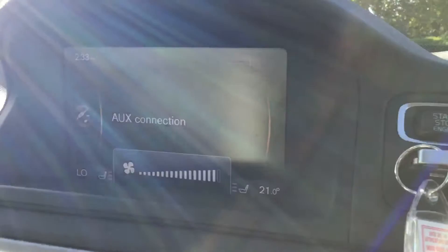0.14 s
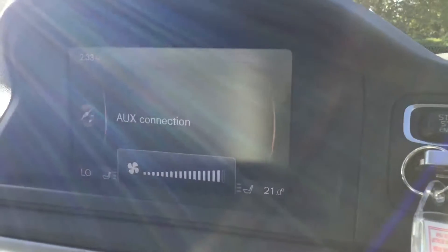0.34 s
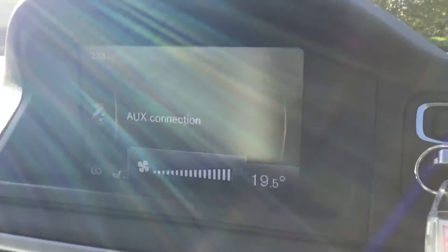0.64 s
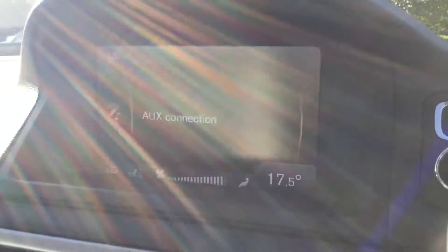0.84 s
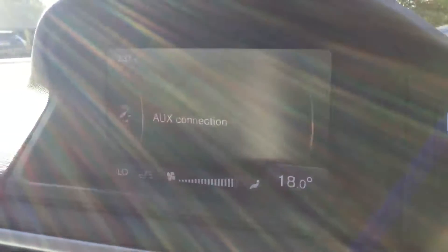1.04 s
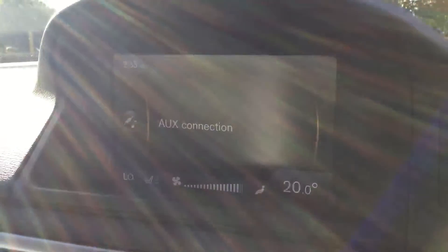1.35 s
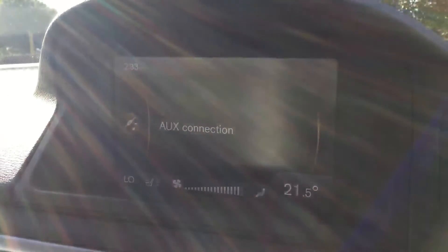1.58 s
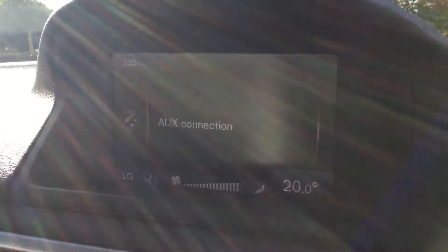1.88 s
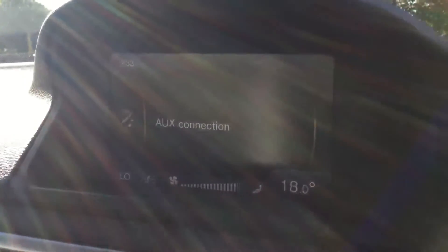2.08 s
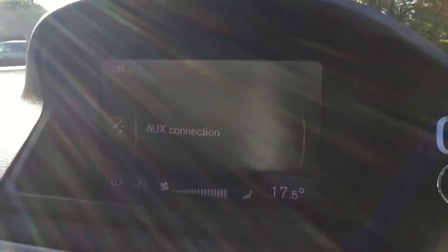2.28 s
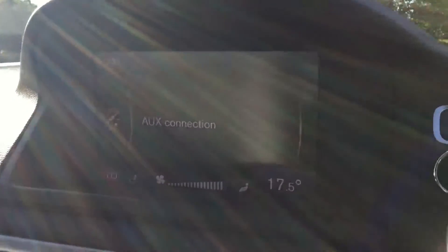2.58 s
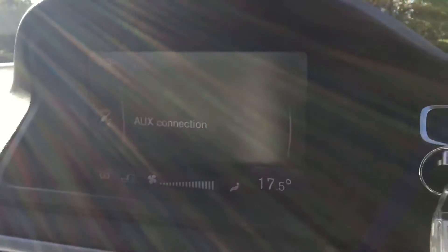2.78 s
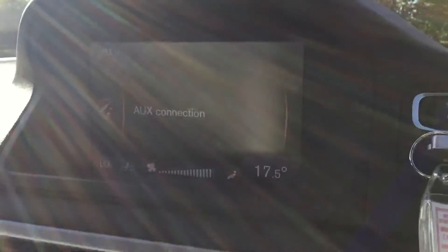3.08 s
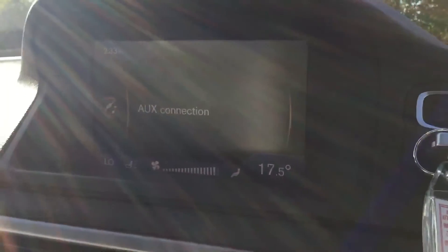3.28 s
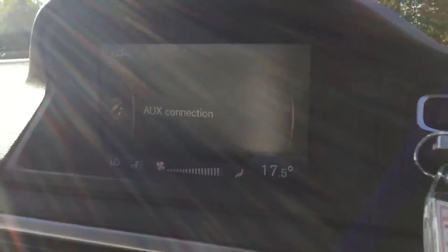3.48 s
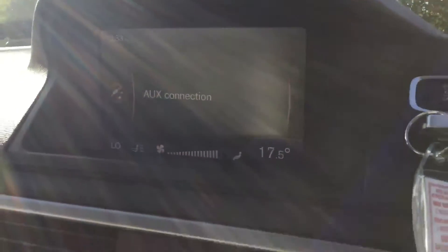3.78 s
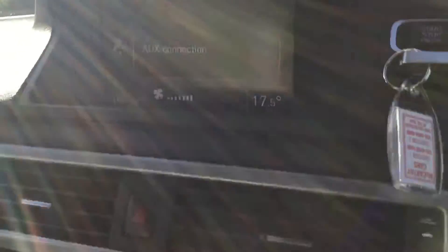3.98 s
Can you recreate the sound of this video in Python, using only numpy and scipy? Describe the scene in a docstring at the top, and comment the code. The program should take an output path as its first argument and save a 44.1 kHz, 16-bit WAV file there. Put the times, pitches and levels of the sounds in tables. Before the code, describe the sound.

Inside a car, a hard-running blower blasts straight across a hand-held microphone. Loud, irregular low thumps, fluttering rumble and dull snaps dominate throughout, broken by tiny lulls. Far quieter behind them is a smooth, even rush of vent air. Small plastic knob detents click during the first two seconds, then stop; a brief bright rustle follows, and faint ticks return near the end. Close, dry, overloaded sound.

```python
"""In a car cabin a blower runs hard, and its jet blows across a hand-held microphone.
Turbulence, shaped noise with gusts, rumbles at the port; wave packets make eddies thump and snap on it,
and deep packets make the low thuds of the recorder's limiter.
Coloured noise gives the smooth rush of the vents and one brief bright rustle;
noise bursts through resonators give knob detents and ticks, dying sines a few tiny high ticks."""
import sys
import numpy as np
from scipy import signal
from scipy.fft import rfft, irfft
from scipy.io import wavfile
from scipy.ndimage import uniform_filter1d, minimum_filter1d

SR = 44100
rng = np.random.default_rng(int(sys.argv[2]) if len(sys.argv) > 2 else 0)


def unload_audio(sound):
    """Save the sound as a 16-bit wav file, at the path given as the first command line argument."""
    columns = np.transpose(np.atleast_2d(sound))
    # keep every value between -1 and 1, then stretch to whole-number steps
    steps = np.round(np.clip(columns, -1, 1) * 32767)
    wavfile.write(sys.argv[1], SR, steps.astype(np.int16))


def volts_from_db(level):
    """Convert decibel levels to linear amplitude ratios."""
    exponent = np.asarray(level, float) / 20
    return 10 ** exponent


N = 182221   # length in samples


def rms_one(x):
    """Normalisation: a signal divided by its root mean square has unit power."""
    return x / np.sqrt(np.mean(x ** 2) + 1e-20)


def at_hz(points, hz):
    """Logarithmic pitch axis: a curve is read in equal steps per octave."""
    points_hz, values = np.transpose(points)
    return np.interp(np.log(hz), np.log(points_hz), values)


def drift(rate_hz):
    """Low-pass filtering: two equal poles turn white noise into a slow random drift of unit spread."""
    settle = SR // 2
    r = np.exp(-2 * np.pi * rate_hz / SR)
    slow = signal.lfilter([1], [1, -2 * r, r * r], rng.standard_normal(N + settle))
    return rms_one(slow[settle:])


def coloured(colour):
    """Spectral shaping: a weighted noise spectrum yields stationary noise, here of rms 1."""
    hz = np.maximum(np.arange(N // 2 + 1) * SR / N, 1)
    spectrum = rfft(rng.standard_normal(N)) * volts_from_db(at_hz(colour, hz))
    return hz, spectrum / np.sqrt(np.mean(irfft(spectrum, N) ** 2))


# course of the jet's buffeting on the port: time_s, level_db
JET_COURSE = [(0, -17.5), (.7, -21), (1.08, -16), (1.45, -21.5), (1.61, -21), (1.76, -20), (2.0, -19),
              (2.2, -16.5), (2.5, -19.5), (3.0, -18), (3.68, -18.5), (4.13, -20)]
# moments when the jet slips off the port: centre_s, depth_db (negative lifts), half_length_s
JET_LULLS = [(0.22, 12.5, 0.026), (0.372, 5, 0.017), (0.437, 6, 0.0098), (0.881, 18.5, 0.0073),
             (1.094, 9.5, 0.024), (1.325, 2, 0.045), (1.626, 4.5, 0.021), (1.75, 2.5, 0.033),
             (1.984, 7.5, 0.019), (2.16, 11, 0.0069), (2.251, 4, 0.031), (2.696, 3.5, 0.013),
             (2.838, 7.5, 0.019), (3.103, 10, 0.011), (3.285, 28, 0.0021), (3.409, 10.5, 0.0073),
             (3.596, 4, 0.01), (3.76, -0.5, 0.018), (4.025, 19, 0.0087)]


def jet_db(s):
    """Intermittency: the flow's level at the given times is a slow course less bell-shaped lulls."""
    dips = sum(depth_db * np.exp(-((s - at) / half) ** 2) for at, depth_db, half in JET_LULLS)
    return np.interp(s, *np.transpose(JET_COURSE)) - dips


# colour of the turbulence, before its gusts: pitch_hz, relative density_db per Hz
BUFFET_COLOUR = [(15, -33), (25, -27), (40, -18), (60, -15), (124, 5), (198, 7.5), (356, 0), (462, -9),
                 (769, -19), (926, -36), (1300, -45.5), (2200, -120)]
# how strongly each pitch follows a gust: pitch_hz, lift_db per unit of gust
GUST_RESPONSE = [(40, 1.0), (120, 0.31), (300, 4.38), (700, 7.9)]


def buffeting(level_db, large):
    """Modulated turbulence: gusts, partly the wake of the large eddies, lift the upper bands most."""
    gust_hz, swirl_hz = 49.7, 71.5       # corners of the shared gusts and of each band's own swirl
    gust_cap = 1.34                      # chance gusts saturate at this many spreads
    gust_lag_cycles = 0.92               # a gust reaches each band after this many swings: highs first
    stirred, wake_s = 0.26, 0.015        # weight of the wake, and its averaging time
    hz, spectrum = coloured(BUFFET_COLOUR)
    wake = np.log(uniform_filter1d(large ** 2, size=int(wake_s * SR)) + 0.00036)
    chance_gust = gust_cap * np.tanh(0.88 * drift(gust_hz) / gust_cap)
    gust = stirred * rms_one(wake - wake.mean()) + chance_gust
    n, out = np.arange(N), 0
    for step in range(14):
        centre_hz = 20 * 2 ** (step / 2)   # half-octave bands that overlap
        share = np.cos(np.clip(np.log2(hz / centre_hz), -.5, .5) * np.pi) ** 2
        band = irfft(spectrum * share, N)
        late_gust = np.interp(n - gust_lag_cycles * SR / centre_hz, n, gust)
        lift_db = at_hz(GUST_RESPONSE, centre_hz) * (late_gust + .5 * drift(swirl_hz))
        out = out + band * volts_from_db(lift_db)
    return volts_from_db(level_db) * rms_one(out)


# colour of the vent rush, before the duct resonances: pitch_hz, relative density_db per Hz
RUSH_COLOUR = [(530, -6.5), (900, -3.5), (1060, -2), (1240, -3), (1690, -1), (2040, -7.5), (2390, -7.5),
               (3010, -8.5), (3260, -13), (3990, -12.5), (4330, -16), (6010, -16), (7500, -24.5),
               (9750, -52), (16500, -120)]
# colour of the top hiss: pitch_hz, relative density_db per Hz
HISS_COLOUR = [(4240, -6.5), (7200, -19), (7860, 3.5), (8790, 4), (10200, -1), (13700, 0), (15600, -6.5)]
# duct resonances in the rush: pitch_hz, width_hz, lift_db
DUCT_RESONANCES = [(1730, 130, 0), (2360, 130, 4.5), (3060, 51, 5), (3395, 84, 5.5), (3970, 340, 0.5),
                   (6320, 870, 2.5)]
# rush of the air flow, before the duct resonances: time_s, level_db
AIR_FLOW = [(0, -43), (.7, -42.5), (1.0, -41.5), (2.1, -41), (3.95, -41), (4.13, -43)]


def vents():
    """Broadband flow noise: air rushes evenly from the louvres, with mild duct resonances and a top hiss."""
    mean_hiss_db, hiss_follows = -60, 1.8   # hiss at mean flow; its change in dB per dB of rush
    rush_db = np.interp(np.arange(N) / SR, *np.transpose(AIR_FLOW))
    hiss_db = mean_hiss_db + hiss_follows * (rush_db - rush_db.mean())
    hz, rush = coloured(RUSH_COLOUR)
    for centre_hz, width_hz, lift_db in DUCT_RESONANCES:
        rush = rush * volts_from_db(lift_db / (1 + (2 * (hz - centre_hz) / width_hz) ** 2))
    hiss = irfft(coloured(HISS_COLOUR)[1], N)
    return volts_from_db(rush_db) * irfft(rush, N) + volts_from_db(hiss_db) * hiss


def packets(rows):
    """Wave packets: smooth swings sink in pitch; their spectrum dies away exponentially upward."""
    sag = 0.317   # starts higher, ends lower by about this share of the pitch
    half = 4000
    out, t = np.zeros(N + 2 * half), np.arange(-half, half) / SR
    phases = rng.uniform(0, 2 * np.pi, len(rows))
    for (peak_s, level_db, hz, length_s), phase in zip(rows, phases):
        power = max((2.67 * hz * length_s) ** 2, 3.0)   # more cycles, higher power
        packet = (1 - 2j * np.pi * hz * t / power) ** -power
        bend = phase - sag * 2 * np.pi * hz * np.hypot(t, length_s)
        at = round(peak_s * SR)
        out[at:at + 2 * half] += volts_from_db(level_db) * np.real(packet * np.exp(1j * bend))
    return out[half:N + half]


# strongest large eddies on the port: peak_s, level_db of the envelope peak, nominal length_s, pitch_hz
LARGE_EDDIES = [(0.0098, -9.5, 0.012, 248), (0.0475, -8.5, 0.0068, 203), (0.125, -4.5, 0.0037, 249),
                (0.238, -5.5, 0.0036, 284), (0.3925, -9.5, 0.01, 211), (0.4053, -6.6, 0.0052, 236),
                (0.5, -3.5, 0.0065, 261), (0.5413, -7.5, 0.0059, 255), (0.5903, -5, 0.0039, 220),
                (0.629, -14.5, 0.012, 246), (0.684, -10, 0.01, 222), (0.759, -6, 0.0065, 196),
                (0.7765, -5, 0.0033, 276), (0.8395, -7, 0.0034, 239), (0.8558, -11.5, 0.0095, 243),
                (0.908, -10.5, 0.005, 275), (0.932, -12, 0.0074, 301), (0.985, -15, 0.0056, 261),
                (0.9997, -13, 0.0037, 229), (1.0223, -11, 0.0072, 185), (1.1303, -7.5, 0.006, 221),
                (1.1665, -3.5, 0.0041, 272), (1.1995, -5.5, 0.0073, 186), (1.235, -10, 0.02, 221),
                (1.2963, -5.5, 0.0051, 235), (1.376, -9, 0.0055, 254), (1.3957, -5.5, 0.0034, 230),
                (1.4095, 0.5, 0.0047, 234), (1.4254, -6, 0.0092, 211), (1.447, -7.5, 0.0049, 314),
                (1.473, -11, 0.0069, 231), (1.507, -9.5, 0.0053, 206), (1.6784, -9, 0.014, 197),
                (1.697, -7.5, 0.011, 221), (1.7155, -14.5, 0.0035, 210), (1.7351, -9, 0.005, 222),
                (1.7594, -10.0, 0.0049, 227), (1.8274, -5, 0.005, 259), (1.9374, -4.5, 0.0029, 275),
                (1.9542, -7, 0.0066, 169), (1.965, -8.5, 0.0042, 266), (2.102, -14, 0.0039, 234),
                (2.1275, -15.5, 0.0072, 210), (2.1428, -13, 0.015, 194), (2.19, -3, 0.0022, 275),
                (2.286, -2, 0.0032, 229), (2.3341, -11, 0.033, 208), (2.3375, -1.5, 0.011, 211),
                (2.3611, -11.5, 0.0045, 245), (2.3743, -10.9, 0.0045, 230), (2.4196, -4.5, 0.006, 202),
                (2.4616, -4, 0.0056, 265), (2.5127, 0.5, 0.0075, 208), (2.5178, -8, 0.024, 223),
                (2.5447, -2, 0.0033, 299), (2.5635, -11, 0.0089, 208), (2.6162, -4.5, 0.0057, 181),
                (2.6219, -14.5, 0.013, 195), (2.6764, -5, 0.0053, 222), (2.746, -10, 0.012, 300),
                (2.764, -1.5, 0.0052, 328), (2.8508, -9.7, 0.0033, 290), (2.874, -5.5, 0.004, 247),
                (2.9293, -12.5, 0.0079, 277), (2.9514, 0.5, 0.0048, 211), (2.9837, -8.5, 0.0077, 266),
                (3.0445, -15, 0.0048, 208), (3.0701, -8, 0.007, 196), (3.102, -7, 0.0064, 223),
                (3.1713, -12.5, 0.0099, 219), (3.197, -13.5, 0.013, 250), (3.219, -8.5, 0.0047, 227),
                (3.2528, -15.5, 0.015, 296), (3.313, -4.5, 0.019, 196), (3.3746, -8.5, 0.0027, 247),
                (3.3834, -2, 0.0044, 297), (3.4602, -11, 0.0066, 252), (3.507, -8, 0.0042, 247),
                (3.559, -15, 0.0026, 216), (3.659, -12, 0.0132, 211), (3.701, -4.5, 0.0046, 221),
                (3.767, -10.5, 0.0035, 276), (3.87, -3, 0.0032, 233), (3.8903, -14, 0.024, 223),
                (3.9194, -8, 0.0019, 254), (3.946, -10.5, 0.0028, 293), (3.9657, 0.5, 0.0065, 303),
                (4.0415, -9.5, 0.0062, 276), (4.053, -10.5, 0.0036, 263), (4.1099, -10.5, 0.0064, 216)]
# sharpest small eddies on the port: peak_s, level_db of the envelope peak, pitch_hz
SMALL_EDDIES = [(0.126, -18.5, 690), (0.405, -18, 644), (0.419, -14.5, 760), (0.4975, -14.5, 680),
                (0.537, -18, 680), (0.59, -19, 640), (0.6324, -6.5, 680), (0.68, -15.5, 650),
                (0.817, -20, 690), (0.8392, -12.5, 720), (0.9047, -11, 706), (1.077, -23.5, 690),
                (1.203, -28, 760), (1.2428, -13.5, 870), (1.2948, -12.5, 806), (1.375, -18, 614),
                (1.385, -20.5, 900), (1.4049, -8, 810), (1.4208, -11.5, 800), (1.4257, -7, 825),
                (1.4462, -11.5, 850), (1.489, -18, 700), (1.5118, -10.5, 623), (1.547, -19, 723),
                (1.692, -19.5, 696), (1.827, -16, 710), (1.871, -18, 704), (1.923, -16, 720),
                (2.0895, -13, 770), (2.1938, -5, 1080), (2.2029, -11, 620), (2.331, -8.5, 885),
                (2.3366, -10, 940), (2.4206, -3.5, 880), (2.461, -9.5, 840), (2.5, -15, 670),
                (2.519, -12.5, 764), (2.5415, -7.5, 875), (2.5658, -12.5, 915), (2.61, -27, 780),
                (2.673, -20.5, 900), (2.73, -18, 670), (2.7542, -7.5, 860), (2.762, -7, 1150),
                (2.767, -11.5, 910), (2.8495, -15, 795), (2.8817, -13, 930), (2.887, -16, 790),
                (2.9276, -11, 660), (2.984, -16, 756), (3.066, -20.5, 696), (3.0966, -6.5, 770),
                (3.1578, -12, 793), (3.185, -18, 674), (3.203, -10, 800), (3.21, -11.5, 696),
                (3.246, -27, 720), (3.253, -11, 615), (3.298, -14, 620), (3.3052, -22, 656),
                (3.309, -23.5, 670), (3.378, -18.5, 796), (3.388, -11.5, 844), (3.4724, -16, 833),
                (3.4985, -6, 690), (3.5085, -10, 674), (3.57, -10.5, 710), (3.7631, -6.5, 860),
                (3.7665, -14.5, 805), (3.864, -12, 705), (3.889, -11, 684), (3.903, -16, 684),
                (3.9128, -10, 866), (3.944, -14, 680), (3.9611, -9, 760), (3.997, -14, 645),
                (4.061, -13, 640), (4.103, -14.5, 676)]


def thumps_and_snaps(flutter_count=110):
    """Eddy scales: large eddies thump, small ones snap; listed and chance ones join as packets."""
    front_lead_s, front_over_db = 0.0035, -5.5     # mean lead on the thump; level over the buffeting
    front_hz, front_hz_spread = 790, 0.062         # mid pitch, and its spread as a log ratio
    flutter_over_db, flutter_spread_db, flutter_hz = -7, 1.5, 614
    body_lag_s, body_db, body_pitch = 0.00208, -2.5, 0.58   # pitch as a share of the snap's
    snap_cycles, snap_spread = 0.63, 0.16          # swings in a snap at front_hz; log spread
    snap_lingers = 0.65                            # deeper snaps swing more often (power of pitch)
    s, peak_db, length_s, hz = np.transpose(LARGE_EDDIES)

    # a weak snap at the front of every thump
    luck = rng.standard_normal((len(s), 2))
    fronts = np.c_[abs(s - front_lead_s * (1 + luck[:, 0])), jet_db(s) + front_over_db,
                   front_hz * np.exp(front_hz_spread * luck[:, 1])]

    # faint small eddies all along
    at = rng.uniform(0, N / SR, flutter_count)
    luck = rng.standard_normal((flutter_count, 2))
    flutters = np.c_[at, jet_db(at) + flutter_over_db + flutter_spread_db * luck[:, 0],
                     flutter_hz * np.exp(.15 * luck[:, 1])]

    # a deeper swing follows each listed snap
    bodies = np.array(SMALL_EDDIES) * [1, 1, body_pitch] + [body_lag_s, body_db, 0]
    snaps = np.r_[SMALL_EDDIES, bodies, fronts, flutters]
    snap_hz = snaps[:, 2]
    cycles = snap_cycles * (front_hz / snap_hz) ** snap_lingers
    snap_length_s = cycles / snap_hz * np.exp(snap_spread * rng.standard_normal(len(snaps)))
    return packets(np.r_[np.c_[s, peak_db, hz, length_s], np.c_[snaps, snap_length_s]])


# tiny high ticks, as of keys touching: start_s, level_db of the envelope peak
TINY_TICKS = [(.045, -58), (2.09, -52)]


def tinks():
    """Free decay: one high mode, once struck, dies away exponentially."""
    mode_hz, decay_s = 12750, .006
    out, t = np.zeros(N + 1000), np.arange(1000) / SR
    ring = np.exp(-t / decay_s) * np.sin(2 * np.pi * mode_hz * t)
    for start_s, level_db in TINY_TICKS:
        out[round(start_s * SR):][:1000] += volts_from_db(level_db) * ring
    return out[:N]


# knob detents and ticks: start_s, drive level_db of the low, of the middle and of the upper modes
DETENT_CLICKS = [(0.1438, -32.5, -29, -47), (0.194, -37, -41, -50), (0.298, -33, -32, -42.5),
                 (0.3845, -36, -34, -48), (0.561, -38, -44, -48), (0.842, -30, -30, -40),
                 (0.9048, -35, -33, -48), (1.1696, -35, -43, -49), (1.367, -45, -40, -43),
                 (1.5758, -29.5, -31, -39), (1.613, -33, -33, -40), (1.6503, -32, -36, -45),
                 (1.6986, -37, -35, -44), (1.752, -34, -34.5, -49), (1.791, -38, -34, -39),
                 (1.9026, -33, -35, -54), (1.997, -36.5, -37, -48), (3.792, -63, -60, -48),
                 (3.802, -60, -60, -47), (3.808, -60, -60, -47), (3.8185, -56, -58, -47),
                 (4.109, -49, -45.5, -52), (4.121, -49.5, -50, -47)]
# modes the knob rings with: pitch_hz, relative level_db, t60_s of one resonator pass
KNOB_MODES = [(3910, 4, 0.0029), (4430, 2.5, 0.0023), (5660, 4.5, 0.0044), (6800, -2.5, 0.0012),
              (7600, 4, 0.0015), (8440, 9.5, 0.002), (9400, 6, 0.0019), (10450, 5, 0.002),
              (11700, 6, 0.0021), (12900, 3, 0.0016), (14300, 1.5, 0.0017), (15300, -1, 0.0016)]


def knob(low_hz=5000, split_hz=7500, cabin_db=-7, strike_db=8.5):
    """Modal resonance: a strike, a short rattle and a dying cabin echo excite broad plastic modes."""
    rattle_s, cabin_t60_s = 0.0021, 0.11
    rows, out, t = np.array(DETENT_CLICKS), np.zeros(N), np.arange(3000) / SR
    dying = np.exp(-t / rattle_s) + volts_from_db(cabin_db - 60 * t / cabin_t60_s)
    strike = volts_from_db(strike_db) * (t == 0)
    bursts = rng.standard_normal((len(rows), len(t))) * dying + strike
    for hz, level_db, t60 in KNOB_MODES:
        group = (hz > low_hz) + (hz > split_hz)   # 0 low, 1 middle, 2 upper
        clicks = np.zeros(N + len(t))
        for (start_s, *group_db), burst in zip(rows, bursts):
            at = round(start_s * SR)
            clicks[at:at + len(t)] += burst * volts_from_db(group_db[group] + level_db)
        r, w = volts_from_db(-60 / (t60 * SR)), 2 * np.pi * hz / SR
        mode = [(1 - r * r) / 2, 0, (r * r - 1) / 2, 1, -2 * r * np.cos(w), r * r]
        out += signal.sosfilt([mode, mode], clicks[:N] + 1e-18)   # twice: steep skirts
    return out


# low thuds as the recorder's limiter clamps down on overloads:
# peak_s, level_db of the envelope peak, pitch_hz, nominal length_s
LIMITER_THUDS = [(1.415, -24, 32, .008), (2.339, -9, 32, .008), (2.947, -24, 32, .008),
                 (3.305, -17, 32, .008), (3.383, -16, 32, .008), (3.966, -19, 36, .008)]


def limiter_thuds():
    """Gain-step transients: a limiter clamping down on overloads thuds low, drawn as listed wave packets."""
    return packets(LIMITER_THUDS)


# colour of the brief rustle: pitch_hz, relative density_db per Hz
RUSTLE_COLOUR = [(4000, -25), (7000, -7), (9000, 2), (12500, 2), (15600, -3)]


def rustle():
    """Amplitude envelope: bright noise rises quickly and fades slowly along two half-bells."""
    peak_s, rise_s, fall_s, level_db = 2.275, .055, .11, -58
    t = np.arange(N) / SR - peak_s
    swell = np.exp(-(t / np.where(t < 0, rise_s, fall_s)) ** 2)
    return volts_from_db(level_db) * swell * irfft(coloured(RUSTLE_COLOUR)[1], N)


def scene():
    """Superposition: the signals of all layers add linearly."""
    large = thumps_and_snaps()
    turbulence = buffeting(jet_db(np.arange(N) / SR), large)
    mix = large + turbulence + vents() + tinks() + knob() + limiter_thuds() + rustle()
    return mix[None]


def band_limit(x):
    """A steep low-pass at the top of the band."""
    return signal.sosfilt(signal.butter(12, 15720, fs=SR, output="sos"), x)


def record(dry):
    """Band limiting and gain control: low and top cut, then a look-ahead limiter holds the thumps."""
    port_cut_hz, top_cut_hz = 78.5, 16050   # the top cut is 40 dB down from here up
    ceiling, window = .7, 401               # peak amplitude; limiter window in samples
    x = signal.sosfilt(signal.butter(3, port_cut_hz, "high", fs=SR, output="sos"), dry)
    x = signal.sosfilt(signal.cheby2(20, 40, top_cut_hz, fs=SR, output="sos"), x)
    gain = np.minimum(1, ceiling / (abs(x) + 1e-9))
    gain = uniform_filter1d(minimum_filter1d(gain, size=window), size=window)
    return band_limit(x * gain)


dry = scene()
out = record(dry)
unload_audio(out)
```